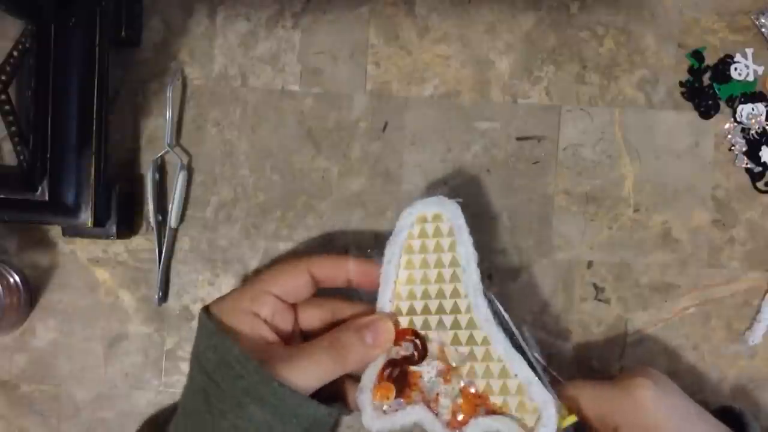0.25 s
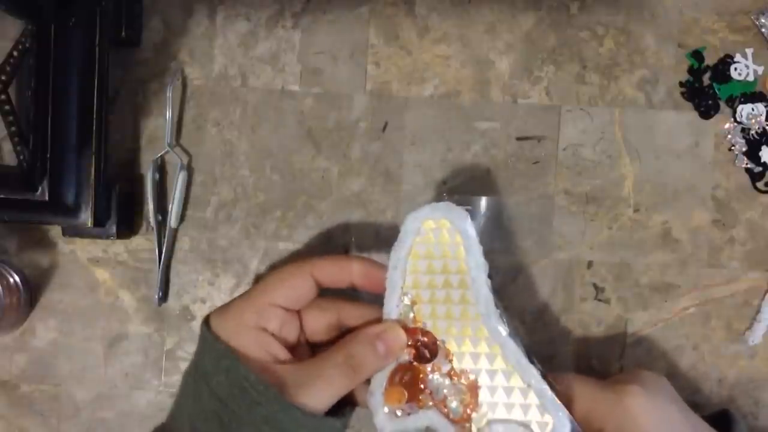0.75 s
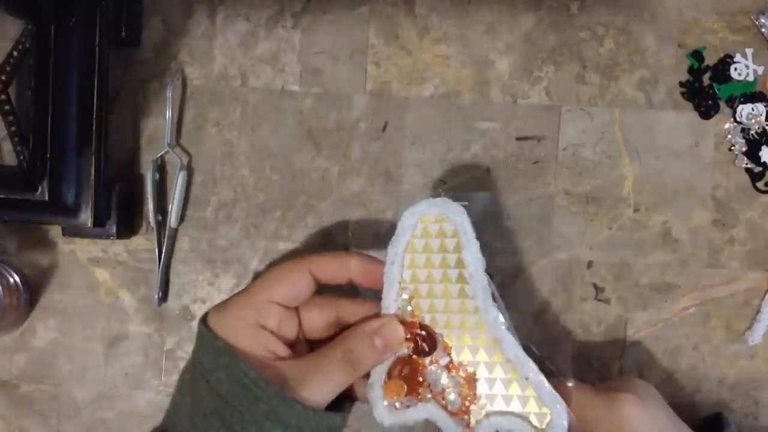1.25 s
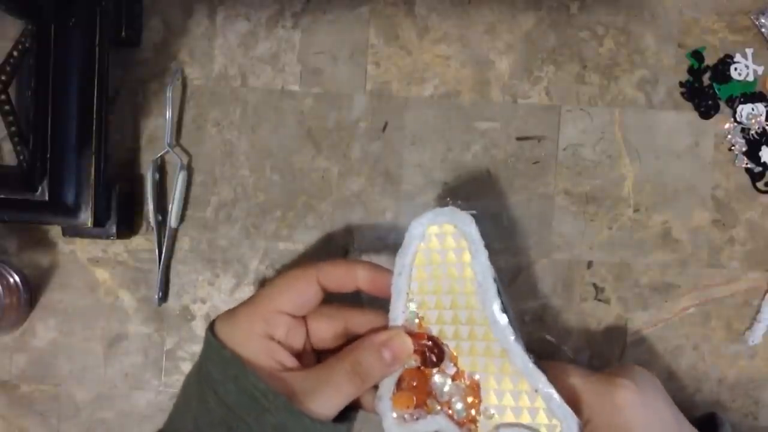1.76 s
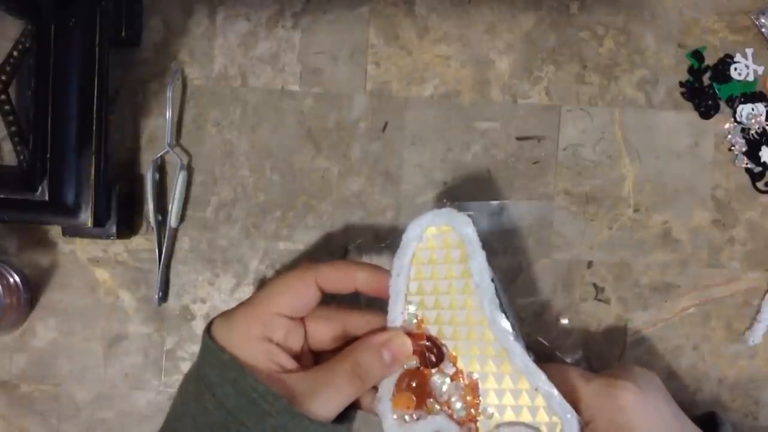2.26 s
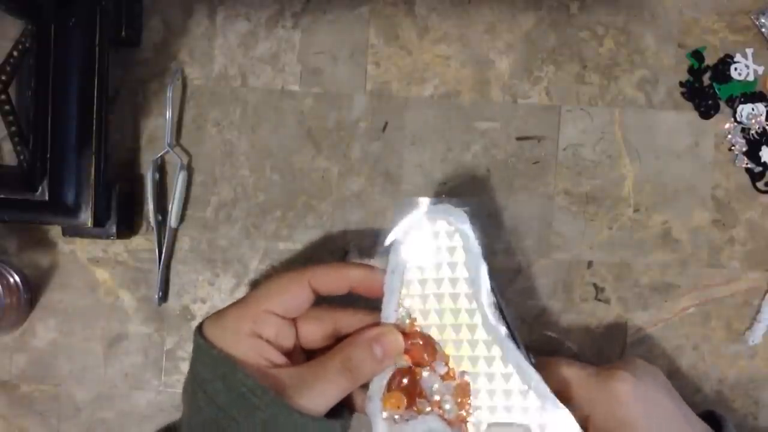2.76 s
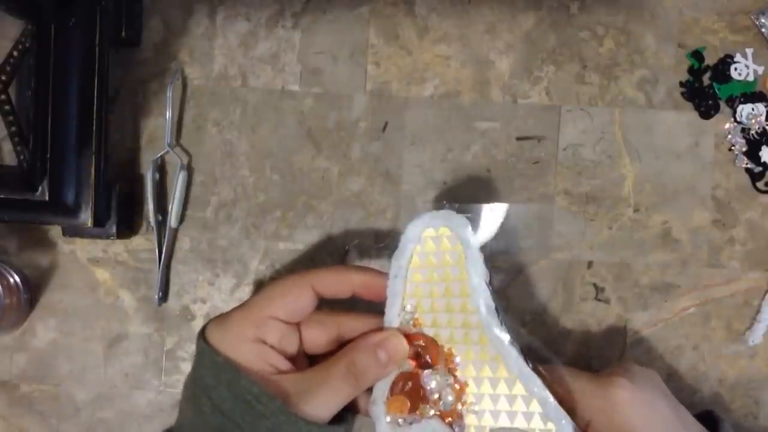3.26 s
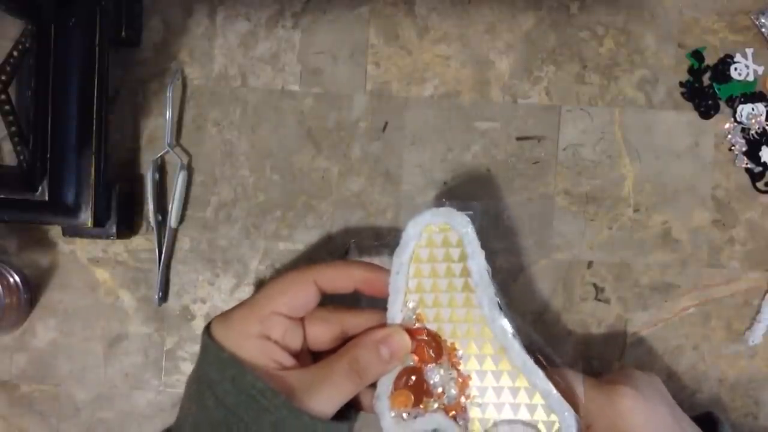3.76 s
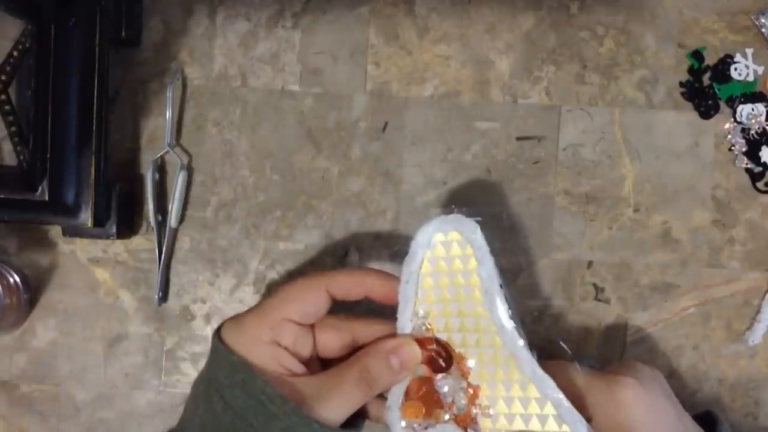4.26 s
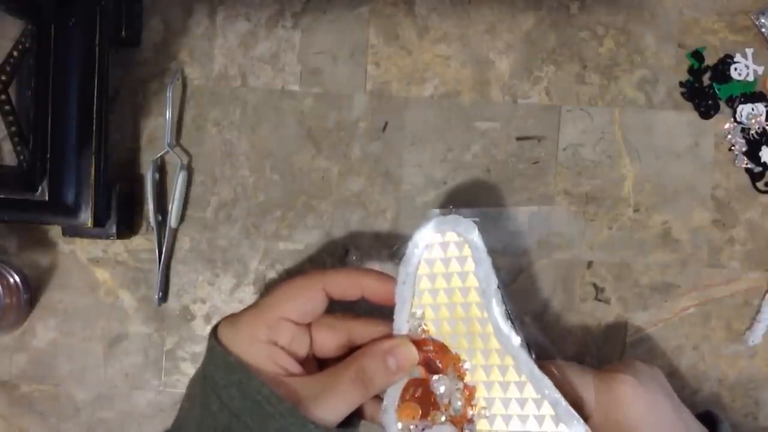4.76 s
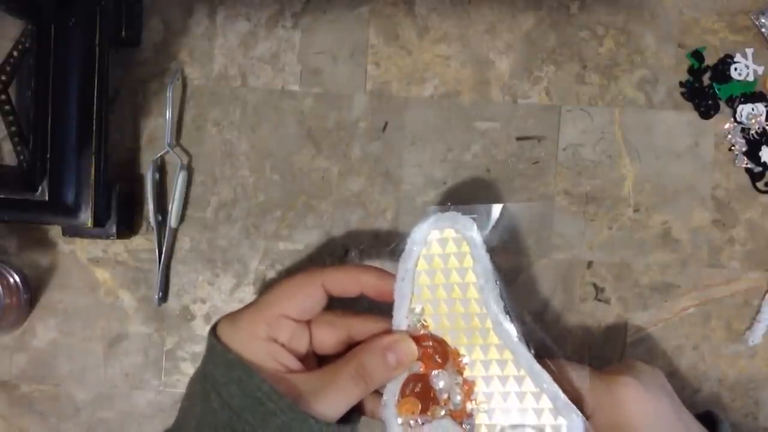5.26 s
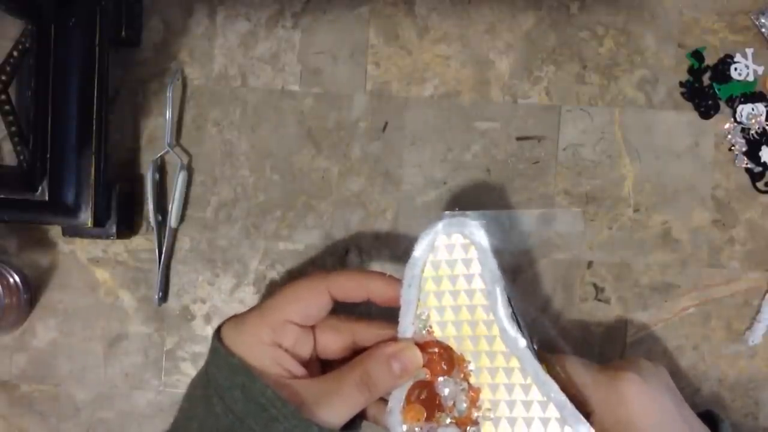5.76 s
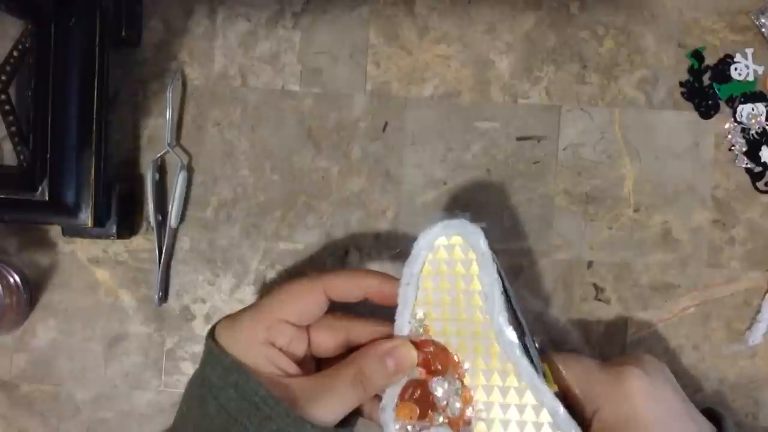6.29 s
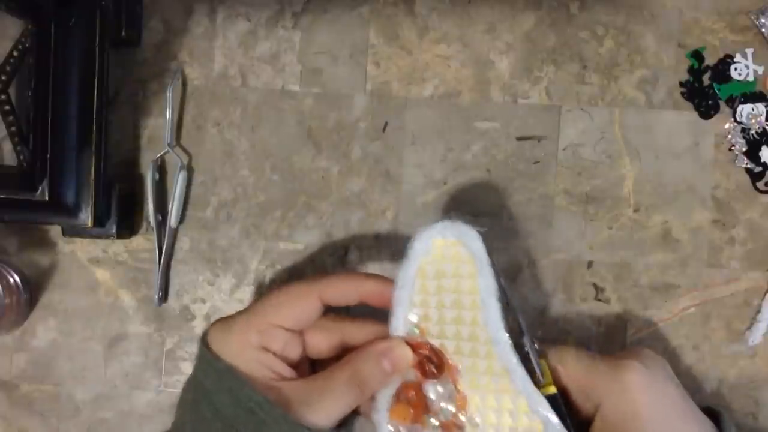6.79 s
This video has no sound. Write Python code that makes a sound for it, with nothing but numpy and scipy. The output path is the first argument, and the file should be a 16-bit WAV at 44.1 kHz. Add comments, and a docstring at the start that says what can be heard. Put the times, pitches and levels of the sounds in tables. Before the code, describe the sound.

Thin stiff plastic sheet snaps, crackles and rustles close up as small scissors cut around it in a quiet room.

```python
"""A thin, stiff plastic sheet snaps and rustles as small scissors cut and turn it near a microphone.
Each snap is a burst of noise that rings the panel and the cut edge, with an echo from the quiet room.
Many tiny creases, made of short noise puffs, form the rustle; sliding blades add a few singing strokes.
Below lie a hiss of coloured noise and a faint drone of gliding sine tones, perhaps an engine outside."""
import sys
import numpy as np
from scipy import signal
from scipy.fft import rfft, irfft, next_fast_len
from scipy.io import wavfile
from scipy.ndimage import uniform_filter1d

SR = 44100
rng = np.random.default_rng(int(sys.argv[2]) if len(sys.argv) > 2 else 0)


def to_wav(s):
    """Save 16-bit WAV."""
    ch = np.atleast_2d(s).T  # columns
    pcm = np.round(np.clip(ch, -1, 1) * 32767)  # PCM
    wavfile.write(sys.argv[1], SR, pcm.astype(np.int16))


N = 310023  # length in samples, about 7 s

# the hiss colour: f/Hz, relative level/dB
HISS_COLOUR = [(13, -48), (22, -17), (70, -16), (220, 6.5), (438, 0), (717, -4), (801, 2), (1210, -11),
               (1460, -1), (2150, -16), (3160, -12.5), (4040, -21), (13500, -14.5), (15500, -13.5)]
HISS_DB = -69.5
# the drone's lowest tone: t/s, f/Hz, level/dB
DRONE_GLIDE = [(1.7, 76.5, -100), (2.18, 81.2, -80.5), (2.69, 84.6, -96), (2.9, 80.05, -85),
               (3.07, 76.8, -91), (3.26, 76.6, -80.5), (3.68, 76, -91), (3.83, 75.2, -104),
               (4.1, 78.2, -97), (4.93, 77.2, -83), (5.4, 73, -94), (5.9, 69.2, -93)]
# tones above the drone's lowest: multiple of its pitch, relative level/dB
DRONE_OVERTONES = [(1.5, -10.5), (2, 1.5), (3, -6.5)]
OVERTONES_DB, WAVER_DB = -87.5, 4  # their shared level, and how strongly it wavers
# how long the echo takes to fall 60 dB: f/Hz, fall time/s
ROOM_FADE = [(300, 0.16), (1500, 0.22), (5000, 0.16), (12000, 0.14)]
# long strokes of the blades along the cut edge: start t/s, rise/s, hold/s, 60 dB fall time/s, level/dB
BLADE_STROKES = [(0.092, 0.011, 0.0092, 0.47, -53.5), (0.194, 0.16, 0.069, 0.37, -55),
                 (0.434, 0.007, .02, 0.74, -48), (2.886, .006, 0.082, 0.45, -49)]
# two bands that ring in the blades: f/Hz, width/Hz, relative level/dB
BLADE_BANDS = [(4600, 800, 0), (7400, 1300, -4)]
# slow handling of the sheet: t/s, rustle level/dB
HANDLING_LEVEL = [(0, -44.5), (.12, -57.5), (.33, -50), (.66, -56), (.76, -72.5), (1.1, -59), (1.4, -71.5),
                  (1.64, -53), (1.9, -65.5), (2.05, -60), (2.7, -68.5), (3.13, -68), (3.29, -59.5),
                  (3.52, -73), (3.82, -63), (4.2, -68.5), (4.74, -71), (4.86, -61.5), (5, -66), (5.46, -65),
                  (5.6, -61.5), (5.97, -65.5), (6.2, -60), (6.5, -62), (7.03, -62)]
HANDLING_PANEL_DB = -13.5  # the panel relative to the handling rustle
# short rasps, where the blades bite or a fold runs along the sheet:
# start t/s, rise/s, hold/s, 60 dB fall time/s, rustle level/dB, panel level/dB
SHORT_RASPS = [(0, 0.00036, 0.003, 0.08, -35.5, -50), (0.384, .015, .012, 0.16, -43, -41.5),
               (0.418, 0.029, 0.053, .3, -39, -45.5), (1.245, 0.054, 0.0096, 0.35, -48, -53),
               (1.341, 0.0036, .0063, .12, -43.5, -48.5), (1.532, 0.0026, 0.034, 0.16, -51, -50),
               (1.582, 0.01, 0.017, 0.067, -37.5, -53), (1.832, .003, 0.0064, 0.1, -47, -50),
               (1.864, .0029, 0.018, 0.17, -43.5, -52), (2.384, 0.028, 0.067, 0.11, -66.5, -66),
               (2.659, .04, .065, 0.28, -65.5, -74), (2.846, 0.0015, 0.045, 0.12, -37, -41),
               (2.893, 0.032, 0.075, 0.26, -44.5, -58.5), (3.202, 0.0037, 0.013, 0.22, -45.5, -40.5),
               (3.463, 0.0079, .059, 0.18, -63.5, -62.5), (3.806, 0.044, .011, .24, -58, -57),
               (4.089, 0.0029, 0.059, 0.19, -49.5, -58.5), (4.444, 0.0029, 0.019, 0.19, -45.5, -39.5),
               (4.52, 0.018, 0.1, 0.39, -67, -72), (4.783, 0.0017, 0.013, 0.16, -61, -56),
               (5.033, 0.038, .058, 0.17, -68.5, -74), (5.419, .07, 0.011, 0.14, -63, -66),
               (5.559, 0.0083, 0.008, 0.14, -55, -47.5), (5.711, 0.044, 0.017, .061, -65, -66),
               (5.934, 0.0024, 0.0034, .18, -38, -45), (6.122, 0.0011, 0.022, 0.095, -50, -66),
               (6.186, 0.0015, .0088, 0.15, -55, -63), (6.461, 0.0042, 0.014, 0.2, -42.5, -51),
               (6.56, 0.0023, 0.015, 0.18, -50.5, -48.5), (6.858, 0.033, 0.028, 0.18, -54, -60.5),
               (6.912, 0.014, 0.025, 0.27, -46.5, -56), (6.991, 0.041, .01, .1, -37, -53)]
# the rustle colour: f/Hz, relative level/dB
RUSTLE_COLOUR = [(1060, -68), (1800, -1), (2100, -54), (2280, -3), (3320, -4.5), (4550, -1.5), (6410, -4),
                 (14400, -6), (15500, 2)]
# the loose offcut's resonance: f/Hz, width/Hz
OFFCUT = (388, 400)
# the offcut's level for a panel at -51 dB and a sudden rise; the share of the panel's dB it follows
OFFCUT_DB, OFFCUT_FOLLOWS = -56, 0.71
OFFCUT_LOSS_DB_PER_S = 157  # a slower rise jolts it less
OFFCUT_FADE = 0.69  # its fall time as a share of the rasp's
# ways the held sheet vibrates: f/Hz, width/Hz, relative level/dB
PANEL_MODES = [(574, 180, -1), (880, 186, 4.5), (1120, 99, 6), (1430, 172, 6), (1745, 870, -3)]
# the louder snaps: t/s, crack peak level/dB, panel f/Hz, panel thump peak level/dB
LOUD_SNAPS = [(0.002, -22.5, 950, -38.5), (0.009, -34, 1470, -44), (0.0913, -39, 1550, -66),
              (0.1162, -26, 1380, -37.5), (0.1863, -51, 1090, -49), (0.2742, -33.5, 970, -34.5),
              (0.3497, -55, 1120, -22.5), (0.414, -28, 940, -29), (0.4597, -25, 1280, -30),
              (0.4813, -48, 1120, -27.5), (0.4947, -41, 1090, -36), (0.567, -33, 1380, -55),
              (0.6194, -41, 1430, -47), (0.7452, -45.5, 960, -42.5), (0.9368, -26, 1440, -40),
              (1.0564, -19, 1140, -48.5), (1.1301, -36, 1880, -60), (1.2823, -38, 1120, -52),
              (1.2997, -50, 1060, -37.5), (1.346, -26, 710, -32), (1.3585, -25, 550, -50),
              (1.5048, -42, 1710, -57), (1.5178, -40, 1690, -51), (1.542, -24.5, 1490, -32),
              (1.5584, -27.5, 1080, -34), (1.5942, -38, 1570, -38), (1.6052, -27, 1000, -56),
              (1.641, -30.5, 1120, -27), (1.7277, -32.5, 1430, -37), (1.833, -16, 1530, -34),
              (1.8542, -28.5, 1180, -46), (1.8684, -47, 1730, -28.5), (1.8787, -27, 1390, -31),
              (2.0874, -37.5, 1270, -32), (2.1339, -38.5, 1160, -58), (2.3687, -75, 517, -52),
              (2.429, -53.5, 980, -43), (2.461, -71, 710, -41.5), (2.7774, -44, 1370, -59),
              (2.8478, -18, 1560, -38), (2.8748, -32, 1336, -20), (2.9898, -46, 1210, -41.5),
              (3.012, -50, 1000, -40.5), (3.0522, -39, 1030, -70), (3.0957, -54, 574, -51.5),
              (3.14, -42, 510, -66), (3.159, -44, 1920, -70), (3.1748, -31.5, 1910, -58),
              (3.2008, -31, 1290, -33), (3.2042, -21.5, 1410, -22), (3.2099, -17, 1620, -31),
              (3.2329, -50, 1040, -33), (3.32, -60, 1080, -50), (3.399, -60, 1150, -56.5),
              (3.4714, -62, 990, -38.5), (3.496, -30, 1314, -72), (3.5178, -40, 1044, -44),
              (3.776, -48, 1850, -62), (3.812, -36.5, 1520, -50), (3.8401, -45, 1130, -38),
              (3.8536, -32, 1380, -26), (3.8817, -59.5, 1510, -53), (4.0642, -29.5, 1180, -51),
              (4.076, -37, 1770, -45), (4.0885, -23.5, 1306, -44), (4.0925, -25, 1020, -45),
              (4.124, -40, 929, -32.5), (4.4414, -33.5, 1460, -48), (4.45, -16, 1120, -27),
              (4.456, -30, 1570, -27), (4.4664, -55, 1180, -25.5), (4.5215, -25.5, 1430, -35),
              (4.6077, -32, 1070, -54), (4.6276, -61, 1000, -50), (4.7878, -28, 1170, -38.5),
              (4.8202, -38, 646, -52), (4.9075, -40.5, 1710, -72), (5.0233, -46, 1650, -73),
              (5.0978, -48, 860, -69), (5.1519, -50, 1800, -58), (5.2716, -30.5, 1330, -43.5),
              (5.4181, -56, 1045, -51.5), (5.4468, -40.5, 1046, -47), (5.4554, -46, 1350, -70),
              (5.4814, -24.5, 880, -27), (5.5299, -39.5, 1270, -54), (5.5712, -26, 1590, -45),
              (5.7226, -41.5, 1594, -55), (5.7455, -38, 514, -70), (5.762, -34.5, 1190, -48),
              (5.9073, -60, 1150, -50), (5.939, -19.5, 1400, -26), (5.9445, -21.5, 1170, -27),
              (6.0393, -35.5, 1380, -46), (6.116, -19.5, 1050, -24), (6.1322, -37, 1600, -34),
              (6.1425, -53, 1380, -50), (6.1544, -35, 1510, -43), (6.1682, -18, 1320, -25.5),
              (6.2898, -66, 1150, -42.5), (6.3433, -48, 1150, -54.5), (6.467, -46, 1340, -40),
              (6.474, -50, 1090, -41), (6.4988, -33, 1120, -40), (6.5643, -30.5, 980, -29),
              (6.599, -50, 1120, -39), (6.895, -35.5, 1000, -45), (6.9264, -34, 945, -38.5),
              (6.9476, -37, 1200, -35.5)]
THUMP_WIDTH_HZ = 260
RING_HZ, RING_SPREAD = 3115, 0.04  # pitch of the cut edge and its relative scatter in snaps
RING_CRACK_DB, RING_THUMP_DB = -14.5, -9  # the edge rings with a share of both crack and thump
RING_RASP_DB = -13  # the edge relative to the panel in creases
# faint random snaps: rate, crack level over the handling, its random rise, and the mean thump relative to the crack
TICKS_PER_S, TICK_DB, TICK_SPREAD_DB, TICK_THUMP_DB = 6, 13, 2.5, -9


def gain_of(db):
    """Turns decibels into a multiplying factor."""
    return 10 ** (np.asarray(db) / 20)


def evened(x):
    """Scales a sound to an average strength (rms) of 1."""
    return x / np.sqrt(np.mean(x ** 2) + 1e-20)


def peaked(x):
    """Scales a sound to a peak of 1."""
    return x / abs(x).max()


def read(points, hz):
    """Reads a table between its rows, with pitch on a log scale."""
    f, value = np.transpose(points)
    return np.interp(np.log(hz + 1), np.log(f + 1), value)


def add(mix, s, sound):
    """Mixes a sound in, starting s seconds from the beginning."""
    part = mix[round(s * SR):][:len(sound)]
    part += sound[:len(part)]


def highpass(x, order, hz):
    """Removes what lies below a pitch, more steeply with a higher order."""
    return signal.sosfilt(signal.butter(order, hz, "high", fs=SR, output="sos"), x)


def colour(x, spectrum):
    """Makes some pitches of a sound louder than others, as a table says."""
    size = next_fast_len(len(x))
    gains = gain_of(read(spectrum, np.fft.rfftfreq(size, 1 / SR)))
    return irfft(rfft(x, size) * gains, size)[:len(x)]


def resonate(x, hz, width):
    """Rings at one pitch with a gain of about 1 there; a narrower width rings longer."""
    r = np.exp(-np.pi * width / SR)
    return 2 * signal.lfilter([1 - r], [1, -r * np.exp(2j * np.pi * hz / SR)], x).real


def envelope(rise_s, hold_s, t60):
    """A swell, a hold and a fade that falls 60 dB in t60 seconds."""
    since = np.arange(SR // 2) / SR
    rise_s = max(rise_s, 1 / SR)
    swell = np.minimum(since / rise_s, 1) ** 2
    fading_s = np.maximum(since - rise_s - hold_s, 0)
    return swell * gain_of(-60 * fading_s / t60)


def hiss():
    """Steady air and microphone noise: random samples with a fixed colour."""
    return gain_of(HISS_DB) * evened(colour(rng.standard_normal(N), HISS_COLOUR))


def drone():
    """A few low tones at fixed multiples of one pitch, so they glide together."""
    s, hz, low_db = np.transpose(DRONE_GLIDE)
    t = np.arange(N) / SR
    turns = np.cumsum(np.interp(t, s, hz)) / SR  # whole cycles so far
    overtones = sum(gain_of(db) * np.sin(2 * np.pi * (k * turns + rng.random()))
                    for k, db in DRONE_OVERTONES)
    # smoothed noise makes the overtones come and go
    smooth = uniform_filter1d(rng.standard_normal(N), size=6000)
    waver = evened(uniform_filter1d(smooth, size=6000))
    overtones *= gain_of(WAVER_DB * waver)
    low = gain_of(np.interp(t, s, low_db)) * np.sin(2 * np.pi * turns)
    lasting = uniform_filter1d((t > s[0]) * (t < s[-1]) * 1., size=8000)  # soft start and end
    return np.sqrt(2) * lasting * (low + gain_of(OVERTONES_DB) * overtones)


def room(x):
    """Sparse reflections of random sign, one in every 20 samples, each band dying at its own speed."""
    taps = np.zeros(SR // 2)
    at = np.arange(200, len(taps) - 20, 20)
    taps[at + rng.integers(0, 20, len(at))] = rng.choice([-1., 1.], len(at))
    hz, t, z = signal.stft(taps, SR, nperseg=256)
    fade = gain_of(-60 * t / read(ROOM_FADE, hz)[:, None])
    tail = signal.istft(z * fade, SR, nperseg=256)[1]
    return signal.fftconvolve(x, tail / np.linalg.norm(tail))[:N]


def creases(per_s, spread_db, length_s):
    """Tiny folds give way at random, a few much harder; each is a short, fading puff of noise."""
    strength = gain_of(spread_db * np.minimum(rng.exponential(1, N), 4))
    folds = strength * (rng.random(N) < per_s / SR)
    fall = np.exp(-np.arange(800) / SR / length_s)
    return evened(signal.oaconvolve(folds, fall)[:N] * rng.standard_normal(N))


def strokes():
    """Sliding friction, nearly smooth, rings two bands of the blades."""
    rub = creases(2500, 2.6, 0.003)
    ring = evened(sum(gain_of(db) * resonate(rub, hz, width) for hz, width, db in BLADE_BANDS))
    level = np.zeros(N)
    for start, rise_s, hold_s, t60, db in BLADE_STROKES:
        add(level, start, gain_of(db) * envelope(rise_s, hold_s, t60))
    return level * ring


def patchy(x, patchy_db):
    """The colour shifts in patches of time and pitch as the sheet changes shape."""
    z = signal.stft(x, nperseg=256)[2]
    across_pitch = uniform_filter1d(rng.standard_normal(z.shape), size=7, axis=0)
    patches = evened(uniform_filter1d(across_pitch, size=9, axis=1))  # smoothed over time too
    return signal.istft(z * gain_of(patchy_db * patches), nperseg=256)[1][:N]


def panel(x):
    """The held sheet vibrates in several ways at once, with little sound below the lowest."""
    rung = sum((-1) ** k * gain_of(db) * resonate(x, hz, width)
               for k, (hz, width, db) in enumerate(PANEL_MODES))
    return highpass(rung, 2, 400)


def creasing():
    """Dense creases rustle; sparser ones shake the panel, the cut edge and the loose offcut."""
    rustle_gain, panel_gain, offcut_gain = np.zeros((3, N))
    for start, rise_s, hold_s, t60, rustle_db, panel_db in SHORT_RASPS:
        swell = envelope(rise_s, hold_s, t60)
        add(rustle_gain, start, gain_of(rustle_db) * swell)
        add(panel_gain, start, gain_of(panel_db) * swell)
        jolt_db = OFFCUT_DB + OFFCUT_FOLLOWS * (panel_db + 51) - OFFCUT_LOSS_DB_PER_S * rise_s
        add(offcut_gain, start, gain_of(jolt_db) * envelope(rise_s, hold_s, OFFCUT_FADE * t60))
    handling = gain_of(np.interp(np.arange(N) / SR, *np.transpose(HANDLING_LEVEL)))
    rustle = evened(patchy(colour(creases(2000, 2.0, .003), RUSTLE_COLOUR), 2.2))
    sparse = creases(1100, 2.0, .003)
    offcut = evened(highpass(resonate(resonate(sparse, *OFFCUT), *OFFCUT), 2, 190))
    edge = evened(resonate(resonate(sparse, RING_HZ, 700), RING_HZ, 1500))
    ringing = evened(panel(sparse)) + gain_of(RING_RASP_DB) * edge
    shaken = (panel_gain + gain_of(HANDLING_PANEL_DB) * handling) * ringing
    heard = (rustle_gain + handling) * rustle + shaken + offcut_gain * offcut
    return highpass(heard, 2, 170)


def burst(noise, rise_s, t60, kick=0.82):
    """A puff of force: a sharp kick as the fold gives, and noise that rises and then falls away."""
    t = np.arange(len(noise)) / SR
    puff = noise * (1 - np.exp(-t / rise_s)) * gain_of(-60 * t / t60)
    kick_at = np.arange(len(noise)) == round(rise_s * SR)  # one sample
    return puff + kick * np.sign(noise[0]) * kick_at


def ticks():
    """Faint snaps at random times, stronger while the sheet is handled; rows like LOUD_SNAPS."""
    when, size, pitch, depth = rng.random((round(TICKS_PER_S * N / SR), 4)).T
    s = when * N / SR
    handling_db = np.interp(s, *np.transpose(HANDLING_LEVEL))
    crack_db = handling_db + TICK_DB + TICK_SPREAD_DB * np.minimum(-np.log(1 - size), 2)
    thump_db = crack_db + TICK_THUMP_DB * 2 * depth
    return list(zip(s, crack_db, 900 + 800 * pitch, thump_db))


def snaps():
    """Each buckle is a wide crack, a short ring of the cut edge and a thump of the panel at its own pitch."""
    out = np.zeros(N)
    rows = LOUD_SNAPS + ticks()
    noises = rng.standard_normal((len(rows), 3, 2000))
    for (s, crack_db, panel_hz, panel_db), (crack_noise, edge_noise, push_noise) in zip(rows, noises):
        crack = peaked(highpass(burst(crack_noise, 0.00028, 0.013, 2.7), 3, 4500))
        edge_hz = RING_HZ * np.exp(RING_SPREAD * edge_noise[-1])  # a random pitch near RING_HZ
        edge_push = burst(edge_noise, .0004, 0.024)
        edge = peaked(resonate(resonate(edge_push, edge_hz, 1250), edge_hz, 7500))
        edge_gain = gain_of(crack_db + RING_CRACK_DB) + gain_of(panel_db + RING_THUMP_DB)
        push = burst(push_noise, 0.00016, 0.006, 2.96)
        own_pitch = peaked(resonate(resonate(push, panel_hz, THUMP_WIDTH_HZ), panel_hz, 1150))
        thump = peaked(own_pitch + 0.82 * peaked(panel(push)))
        add(out, s, gain_of(crack_db) * crack + edge_gain * edge + gain_of(panel_db) * thump)
    return highpass(out, 2, 220)  # a small sheet moves no bass


def scene():
    """Background, strokes and creasing, then the snaps with their echo in the room."""
    background = hiss() + drone()
    cutting = strokes() + creasing()
    snapping = snaps()
    echo = gain_of(-14) * room(snapping)
    return (background + cutting + snapping + echo)[None]


def record(dry):
    """The microphone loses most of its top treble; then the recorder limits the band."""
    below = signal.firwin(255, 15300, window=("kaiser", 6), fs=SR)  # cutoff in Hz
    kept = signal.oaconvolve(dry, below[None], "same")
    heard = kept + gain_of(-37) * (dry - kept)
    band_limit = signal.firwin(511, 16500, window=("kaiser", 9), fs=SR)  # cutoff in Hz
    return signal.oaconvolve(heard, band_limit[None], "same")


dry = scene()
out = record(dry)
to_wav(out)
```